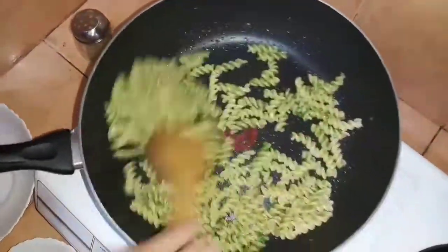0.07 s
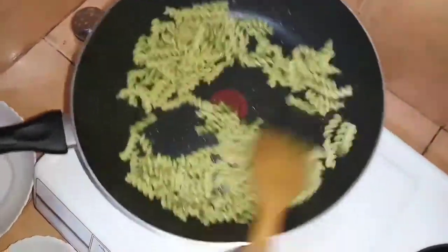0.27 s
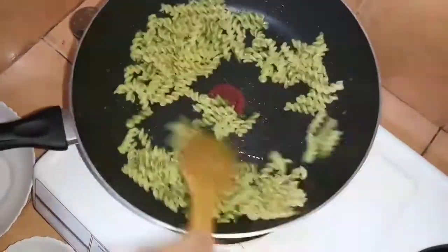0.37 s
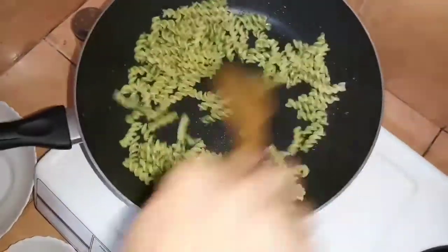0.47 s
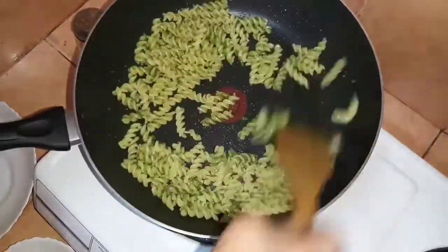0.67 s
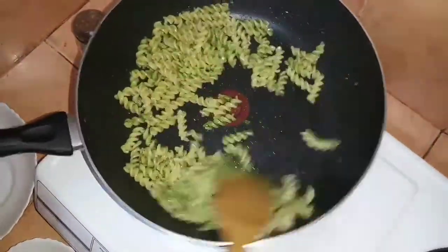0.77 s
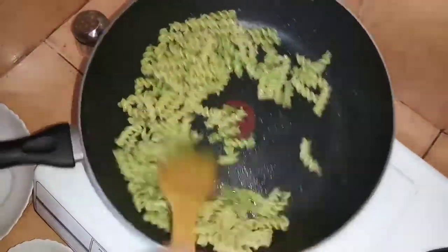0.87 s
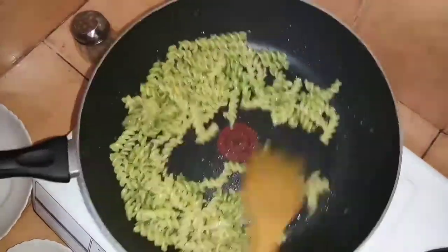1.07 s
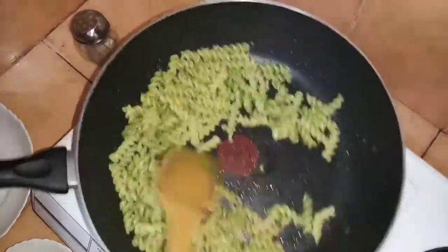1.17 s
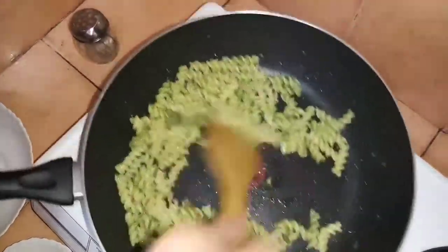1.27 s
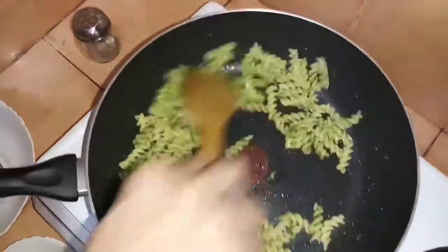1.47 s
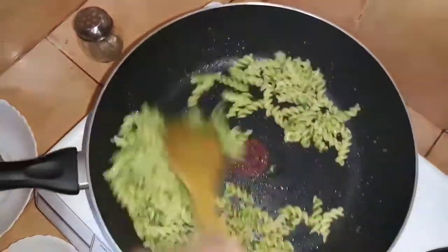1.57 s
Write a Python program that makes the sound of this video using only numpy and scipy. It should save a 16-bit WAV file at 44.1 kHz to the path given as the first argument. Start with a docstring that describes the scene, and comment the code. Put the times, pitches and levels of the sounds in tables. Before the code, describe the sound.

A wooden spatula stirs pasta in a frying pan: two separate knocks, a pause, then a quick clattering scrape and two last taps, over constant sizzling, heard close in stereo in a small kitchen.

```python
"""In a small kitchen, close by, pasta is stirred in a nonstick frying pan.
A wooden spatula knocks on the pan's wall and base: noise clacks excite damped modes of the metal.
Once it judders along the pan by stick-slip; pasta flops over softly and wood rubs as shaped noise.
Oil sizzles throughout as hiss with random spits, above low noise and a faint hum of two tones."""
import sys
import numpy as np
from scipy import signal
from scipy.fft import rfft, irfft, next_fast_len
from scipy.io import wavfile
from scipy.ndimage import uniform_filter1d, minimum_filter1d, map_coordinates

SR = 44100
rng = np.random.default_rng(int(sys.argv[2]) if len(sys.argv) > 2 else 0)


def digitize_waveform(pressure):
    """Quantize a signal to 16-bit integers and store it at the path in sys.argv[1].

    Rows of a 2-D input are taken as channels; values are limited to [-1, 1].
    """
    field = np.atleast_2d(pressure).T
    bounded = np.clip(field, -1, 1)
    quanta = np.round(bounded * 32767).astype(np.int16)
    wavfile.write(sys.argv[1], SR, quanta)


N = 70560

# Spatula on pan; place is 0 wall, 0.5 bend, 1 base:
# start_s, level_db, bass_db, treble_db, ring_db, place, wood_hz, wood_db (relative to level_db)
KNOCKS = [(0.229, -19, -5, 2.5, 4, 0.0066, 1358, 1), (0.462, -21, 0, 0.5, 2.5, 1, 970, 8),
          (0.923, -15, 1, -2.5, 1.5, 0.593, 593, 0), (0.965, -16, -5, -6.5, 2, 0.36, 700, -3),
          (0.979, -16, -2, -1.5, 0.5, 0.093, 3045, -2), (1.010, -20, -23, 2.5, 2, 0.45, 1365, 7),
          (1.181, -19.5, -5.5, -2, -1.5, 0.017, 864, -5.5), (1.299, -26, -6, -8.5, 4, 0.073, 592, -9.5)]
# Soft pushes of spatula and pasta: start_s, level_db, bass_db, ring_db, place
FLOPS = [(0.058, -34, 8, -5, 0.18), (0.160, -37.5, 2.5, -1, 0), (0.643, -41.5, 15, -5.5, 0.95),
         (0.716, -37.5, -7, 4, 0.97), (1.128, -32, 3.5, -2, 0.16), (1.25, -33.5, -2, -6, 1),
         (1.489, -42, -4, 5, 0.08)]
FLOP_RISE_S, FLOP_TREBLE_DB = 0.001, -38
# Pan modes: pitch_hz, t60_s, wall_db, bend_db, base_db (strength when struck there)
PAN_MODES = [(116, 0.55, -20, -19, -12), (181.6, .5, -20, -31, -20), (258, 0.53, -12.5, -16.5, -16.5),
             (294.7, 0.21, -10.5, -9.5, -9.5), (366.8, 0.34, -25.5, -4.5, -14),
             (387.1, 0.4, -26, -17, -10.5), (544.7, .16, -8.5, -35, 5.5), (578.5, 0.17, -8.5, -22, 1),
             (619.5, 0.15, -3, 0, -8), (696, 0.11, -4, -16, -57), (789, 0.24, -14.5, -8, -11.5),
             (918, 0.075, -23, -17.5, 5), (1091, 0.16, -16, -10, -16), (1327, 0.31, -12, -2, -42),
             (1480, 0.13, -3, -10, -27), (1484, 0.15, -1.5, -23, -3), (1664, 0.2, -42, -36, -5),
             (1967, 0.14, -3.5, -5, -24), (2268, 0.23, -6.5, -22, -11), (2495, .13, -35, -3.5, 1.5),
             (2604, 0.21, -9.5, -7, -14), (2983, 0.17, -3.5, -24, -3.5), (3320, 0.11, -16, -7, -8),
             (4210, 0.21, -10, -3.5, -9.5), (6700, 0.084, -5.5, -5, -16)]
RING_DB, RING_RISE_S = -2.5, 0.0013
RING_WAVER_RAD, WAVER_PER_S = 0.5, 96  # phase unsteadiness and the upper limit of its speed
# Dense clack of wood on metal, relative density per Hz: frequency_hz, density_db
CLACK_SPECTRUM = [(30, -43), (85, -28), (115, -29), (150, -17), (270, -0.5), (450, -3.5), (700, -1),
                  (1100, -3), (1500, -5.5), (3000, -3.5), (5000, -6.5), (7000, -10), (10000, -20),
                  (15000, -43)]
# Decay of the clack: frequency_hz, t60_s
CLACK_T60 = [(150, 0.17), (700, 0.22), (2500, 0.26), (8000, 0.07)]
CLACK_RISE_S, CLACK_HOLD_S = 0.00073, 0.009
# Share of the bass tilt each band receives: frequency_hz, share (0 to 1)
BASS_SHELF = [(300, 1), (800, 0.088)]
# Share of the treble tilt each band receives: frequency_hz, share (0 to 1)
TREBLE_SHELF = [(1200, 0), (5000, 1)]
WOOD_T60_S = 0.064  # the blade's own tone dies quickly
CRACK_DB, CRACK_DECAY_S = 0.5, 0.0012  # relative to the knock; time constant
# Squeaks of the spatula's edge: start_s, pitch_hz, level_db, length_s (peak at length / pi)
SQUEAKS = [(0.9229, 4990, -13, 0.0083), (0.9235, 6000, -13.5, 0.0099), (0.966, 5090, -15.5, 0.011)]

# Level of the juddering stroke: time_s, level_db
STROKE_LEVEL = [(0.918, -56), (0.94, -25.5), (0.966, -25), (0.988, -14.5), (1.004, -26), (1.027, -27.5),
                (1.05, -41), (1.12, -78)]
# Scrape colour, relative density per Hz: frequency_hz, density_db
SCRAPE_SPECTRUM = [(100, -22), (350, -34), (700, 18), (1000, 11.5), (1350, 7), (3000, 13), (4500, -1.5),
                   (8000, -2), (15000, -19)]
SLIPS_PER_S, SLIP_DECAY_S = 240, 0.005
# Level of the blade sliding softly under the pasta, before flutter: time_s, level_db
SLIDE_LEVEL = [(0, -54), (0.15, -43.5), (0.33, -42.5), (0.42, -50), (0.83, -59.5), (0.9, -41),
               (1.28, -43.5), (1.44, -58), (1.53, -48), (1.6, -49)]
# Rubbing colour, relative density per Hz: frequency_hz, density_db
RUB_SPECTRUM = [(100, -40), (260, -11), (450, -9), (700, 3), (900, -8), (2000, -8), (5000, -48)]
SLIDE_FLUTTER_DB = 2.5  # scale of the random level changes

# Sizzle level, before its common offset and flutter: time_s, level_db
SIZZLE_LEVEL = [(0, -33.5), (0.15, -33), (0.3, -33.5), (0.45, -33.5), (0.62, -34.5), (0.68, -33),
                (0.76, -33.5), (0.83, -30.5), (0.97, -29), (1.12, -33.5), (1.3, -34.5), (1.4, -36),
                (1.52, -34), (1.6, -34)]
# Sizzle colour, relative density per Hz: frequency_hz, density_db
SIZZLE_SPECTRUM = [(200, -60), (600, -18.5), (1200, -14), (2100, -9), (2900, -2), (4500, -0.5), (6700, 1),
                   (8500, 0), (10600, -3.5), (13000, -10.5), (15200, -18)]
SIZZLE_OFFSET_DB = 1.5
SPIT_DB, SPITS_PER_S = -6, 1000  # level relative to the hiss; mean rate
SPIT_DECAY_S, SPIT_SPREAD_DB = 0.0006, 2.8

# Decay of the room: frequency_hz, t60_s
ROOM_T60 = [(120, 0.69), (300, 0.36), (800, 0.41), (2000, 0.22), (8000, 0.2)]
ROOM_DB, ROOM_BUILD_S = -9.5, 0.0026  # level; time constant for the echoes to fill in
# Steady background colour, relative density per Hz: frequency_hz, density_db
KITCHEN_SPECTRUM = [(20, -33), (55, -6), (85, -29), (115, 19.5), (150, -7.5), (250, -6.5), (450, -7),
                    (800, -7), (1500, -22), (4000, -73)]
KITCHEN_DB = -53
# Hum components: pitch_hz, level_db (rms)
HUM = [(58, -64.5), (116, -77)]

# Left-right likeness of pan, room and background: frequency_hz, coherence (-1 to 1)
PAN_COHERENCE = [(120, -0.05), (250, 0.96), (500, 0.91), (1000, 0.32), (2500, -0.07), (8000, 0)]
# Left-right likeness of the sizzle: frequency_hz, coherence (-1 to 1)
SIZZLE_COHERENCE = [(1000, 0.014), (4000, 0.07), (12000, 0.012)]
# Lean of the stirring: frequency_hz, left_minus_right_db
PAN_LEAN = [(500, 0), (1100, -1), (2000, -2.5), (4500, -7), (9000, -4.5)]
# Lean of the sizzle: frequency_hz, left_minus_right_db
SIZZLE_LEAN = [(1000, 1), (2500, -2), (4500, -5), (7000, -4.5), (13000, -1.7)]
# Stereo width of the close microphone pair: frequency_hz, side_gain_db
WIDTH = [(60, -34), (140, -14), (300, 4), (600, 0.5)]
CEILING, TOP_HZ = 0.88, 15350  # limiter peak (full scale is 1); band limit


def amp(db):
    """Level law: decibels become an amplitude ratio."""
    return 10 ** (np.asarray(db) / 20)


def unit(x):
    """Normalisation: scale to rms 1."""
    return x / np.sqrt(np.mean(x ** 2) + 1e-20)


def along(points, hz):
    """Logarithmic pitch scale: interpolate (Hz, value) points on it."""
    f, v = np.transpose(points)
    return np.interp(np.log(hz + 1), np.log(f + 1), v)


def curve(rows):
    """Linear interpolation: (s, value) points become one value per sample."""
    return np.interp(np.arange(N) / SR, *np.transpose(rows))


def wobble(rate, size=N):
    """Slow random modulation: a smooth curve through `rate` random knots a second."""
    knots = rng.standard_normal(N // 16)
    return map_coordinates(knots[:int(size * rate / SR) + 4], [np.arange(size) * rate / SR])


def filtered(x, response):
    """Linear filtering: multiply the spectrum by a response of frequency."""
    m = next_fast_len(N + SR // 2)
    return irfft(rfft(x, m) * response(np.fft.rfftfreq(m, 1 / SR)), m)[..., :N]


def spread(pair, spectrum, coherence):
    """Stereo coherence: two unrelated signals become coloured stereo of rms 1."""
    def turn(hz):
        return np.arccos(np.clip(along(coherence, hz), -1, 1)) / 2

    def mid_side(hz):
        return amp(along(spectrum, hz)) * [np.cos(turn(hz)), np.sin(turn(hz))]

    mid, side = filtered(pair, mid_side)
    return unit(np.array([mid + side, mid - side]))


def noise(spectrum, coherence):
    """Spectral shaping: white noise becomes coloured stereo noise of rms 1."""
    return spread(rng.standard_normal((2, N)), spectrum, coherence)


def lean(x, points):
    """Level panning: shift each band to one side."""
    return filtered(x, lambda hz: amp(along(points, hz) * np.array([[.5], [-.5]])))


def fading(x, t60s, hold):
    """Frequency-dependent damping: after the hold, each band dies at its own speed."""
    hz, t, z = signal.stft(x, SR, nperseg=256)
    fall = amp(-60 * np.maximum(t - hold, 0) / along(t60s, hz)[:, None])
    return signal.istft(z * fall, SR, nperseg=256)[1][:, :N]


def ticks(rate, spread_db):
    """Random arrivals: impulses whose levels scatter exponentially in decibels, up to a cap."""
    strength = amp(spread_db * np.minimum(rng.exponential(size=N), 4))
    return (rng.random(N) < rate / SR) * strength


def bursts(shapes, rate, spread_db):
    """Shot noise: each burst shape recurs at its share of the mean rate."""
    total = np.zeros((2, N))
    for shape in shapes:
        impulses = ticks(rate / len(shapes), spread_db)[None]
        total += signal.fftconvolve(impulses, shape, axes=1)[:, :N]
    return total


def add(track, s, sound):
    """Superposition: mix a sound in at time s."""
    start = round(s * SR)
    part = sound[:, :N - start]
    track[:, start:start + part.shape[1]] += part


def spatula():
    """Impact excitation: hard knocks with a wooden tone, soft pushes through pasta, brief squeaks."""
    out, t = np.zeros((2, N)), np.arange(N) / SR
    for s, db, bass_db, treble_db, ring_db, place, wood_hz, wood_db in KNOCKS:
        add(out, s, amp(db) * contact(bass_db, treble_db, ring_db, place, CLACK_RISE_S))
        add(out, s, amp(db + wood_db) * mode(wood_hz, WOOD_T60_S))
        add(out, s, amp(db + CRACK_DB) * crack())
    for s, db, bass_db, ring_db, place in FLOPS:
        add(out, s, amp(db) * contact(bass_db, FLOP_TREBLE_DB, ring_db, place, FLOP_RISE_S))
    for s, hz, db, length in SQUEAKS:
        u = np.pi * t / length
        envelope = u * np.exp(1 - u)
        waver = 1.8 * np.array([wobble(736), wobble(695)])  # phase, separate left and right
        add(out, s, amp(db) * envelope * np.sin(2 * np.pi * hz * t + waver))
    return out


def contact(bass_db, treble_db, ring_db, place, rise):
    """Modal excitation: a touch gives a dense clack and the modes that its place drives."""
    t = np.arange(N) / SR

    def tilt(hz):
        return amp(bass_db * along(BASS_SHELF, hz) + treble_db * along(TREBLE_SHELF, hz))

    clack = filtered(noise(CLACK_SPECTRUM, PAN_COHERENCE), tilt)
    clack = fading(clack, CLACK_T60, CLACK_HOLD_S)
    ring = np.zeros((2, N))
    for hz, t60, *place_db in PAN_MODES:
        strength = amp(np.interp(place, [0, .5, 1], place_db)) * tilt(hz)
        add(ring, 0, strength * mode(hz, t60))
    return (clack + amp(RING_DB + ring_db) * ring) * (1 - np.exp(-t / rise))


def mode(hz, t60):
    """Damped resonance: a slightly unsteady tone reaches the two microphones out of step."""
    t = np.arange(SR // 2) / SR
    apart = np.arccos(np.clip(along(PAN_COHERENCE, hz), -1, 1)) * rng.choice([-.5, .5])
    waver = RING_WAVER_RAD * wobble(min(WAVER_PER_S, hz / 10), size=len(t))
    phase = 2 * np.pi * (hz * t + rng.random()) + waver
    decay = np.exp(-np.log(1000) * t / t60)  # -60 dB at t60
    end_fade = np.minimum(1, 20 * (t[-1] - t))
    envelope = decay * (1 - np.exp(-t / RING_RISE_S)) * end_fade
    return envelope * np.sin(phase + np.array([[apart], [-apart]]))


def crack():
    """Impulsive radiation: the first instant of a hard knock is fast-decaying noise."""
    return noise(CLACK_SPECTRUM, PAN_COHERENCE) * np.exp(-np.arange(N) / SR / CRACK_DECAY_S)


def scrape():
    """Stick-slip friction: the wooden edge judders along the pan, each slip a tiny clack."""
    t = np.arange(SR // 20) / SR
    shapes = rng.standard_normal((3, 2, len(t))) * np.exp(-t / SLIP_DECAY_S)
    slips = bursts(shapes, SLIPS_PER_S, spread_db=-0.5)
    return amp(curve(STROKE_LEVEL)) * spread(slips, SCRAPE_SPECTRUM, PAN_COHERENCE)


def slide():
    """Sliding friction: wood and pasta rub softly and unevenly over the pan."""
    level_db = curve(SLIDE_LEVEL) + SLIDE_FLUTTER_DB * wobble(40.3)
    return amp(level_db) * noise(RUB_SPECTRUM, PAN_COHERENCE)


def sizzle():
    """Shot noise: countless tiny bursts in oil merge into a hiss; larger spits stand out."""
    t = np.arange(SR // 100) / SR
    shapes = rng.standard_normal((4, 2, len(t))) * np.exp(-t / SPIT_DECAY_S)
    spits = spread(bursts(shapes, SPITS_PER_S, SPIT_SPREAD_DB), SIZZLE_SPECTRUM, SIZZLE_COHERENCE)
    oil = noise(SIZZLE_SPECTRUM, SIZZLE_COHERENCE) + amp(SPIT_DB) * spits
    level_db = SIZZLE_OFFSET_DB + curve(SIZZLE_LEVEL) + 0.68 * wobble(21.55)
    return amp(level_db) * lean(oil, SIZZLE_LEAN)


def room(x, count=7):
    """Reverberation: decaying noise tails cross-fade in turn, so the echoes' fine pattern changes."""
    wet, t = np.zeros((2, N)), np.arange(SR // 2) / SR
    for k in range(count):
        share = np.maximum(0, 1 - np.abs(np.linspace(0, count - 1, N) - k))
        tail = fading(rng.standard_normal((2, len(t))), ROOM_T60, 0)[:, :len(t)]
        tail = tail * (1 - np.exp(-t / ROOM_BUILD_S))
        wet += signal.fftconvolve(x * share, tail / np.linalg.norm(tail[0]), axes=1)[:, :N]

    def turn(hz):
        return np.arcsin(np.clip(along(PAN_COHERENCE, hz), -1, 1)) / 2

    # blending each side with the other sets the coherence
    own = filtered(wet, lambda hz: np.cos(turn(hz)))
    other = filtered(wet[::-1], lambda hz: np.sin(turn(hz)))
    return own + other


def background():
    """Steady ambience: low kitchen noise and a mains hum with slowly wandering phase."""
    t = np.arange(N) / SR
    hum = np.zeros(N)
    for hz, db in HUM:
        hum += amp(db) * np.sqrt(2) * np.sin(2 * np.pi * hz * t + .3 * wobble(3.4))
    return amp(KITCHEN_DB) * noise(KITCHEN_SPECTRUM, PAN_COHERENCE) + hum


def scene():
    """Superposition: stirring with its reverberation, over the sizzle and the background."""
    stirring = spatula() + scrape() + slide()
    in_room = stirring + amp(ROOM_DB) * room(stirring)
    return lean(in_room, PAN_LEAN) + sizzle() + background()


def record(dry):
    """Close-pair pickup: bass is almost mono, a fast limiter holds peaks, a band limit ends it."""
    mid = (dry[0] + dry[1]) / 2
    side = filtered((dry[0] - dry[1]) / 2, lambda hz: amp(along(WIDTH, hz)))
    pair = np.array([mid + side, mid - side])
    needed = CEILING / np.maximum(np.abs(pair).max(axis=0), CEILING)
    gain = uniform_filter1d(minimum_filter1d(needed, size=129), size=65)
    return filtered(pair * gain, lambda hz: hz < TOP_HZ)


dry = scene()
out = record(dry)
digitize_waveform(out)
```